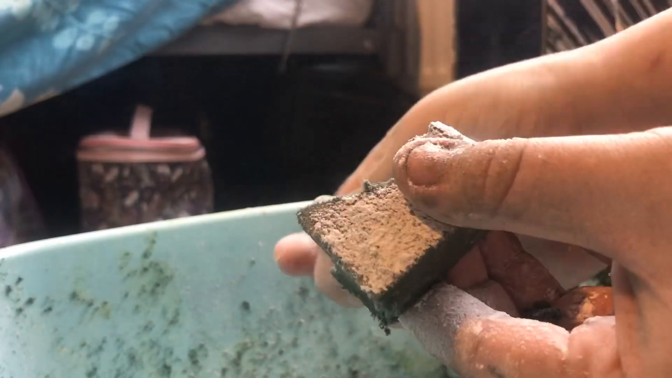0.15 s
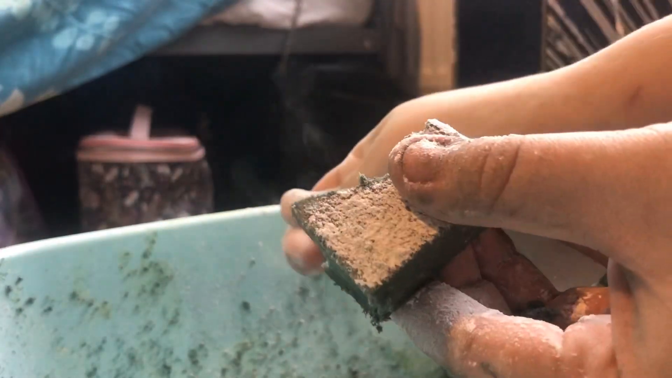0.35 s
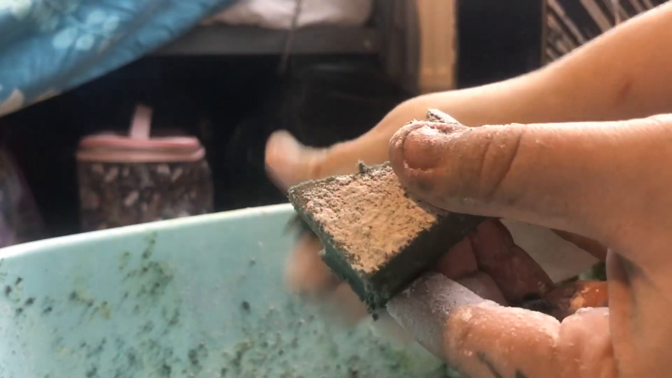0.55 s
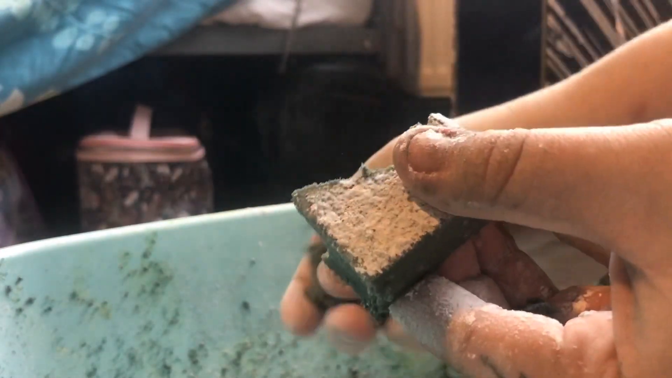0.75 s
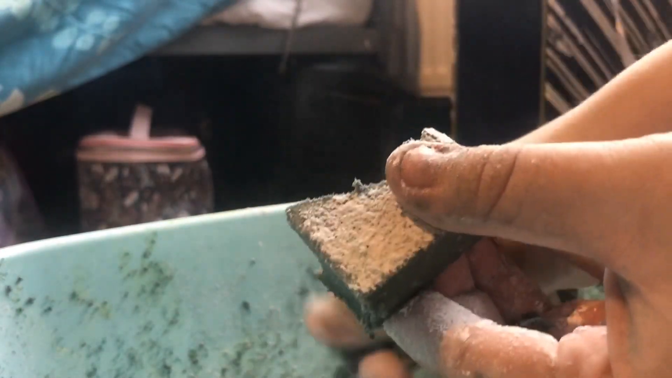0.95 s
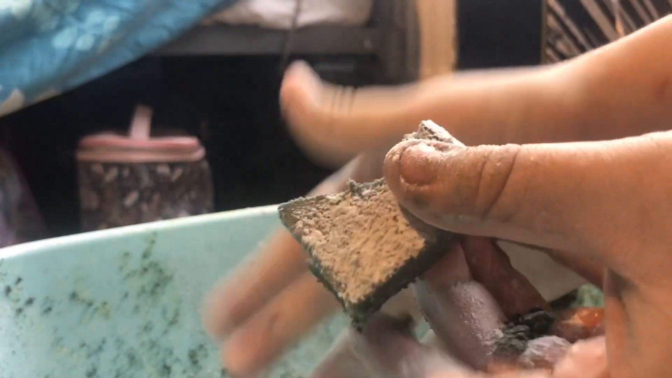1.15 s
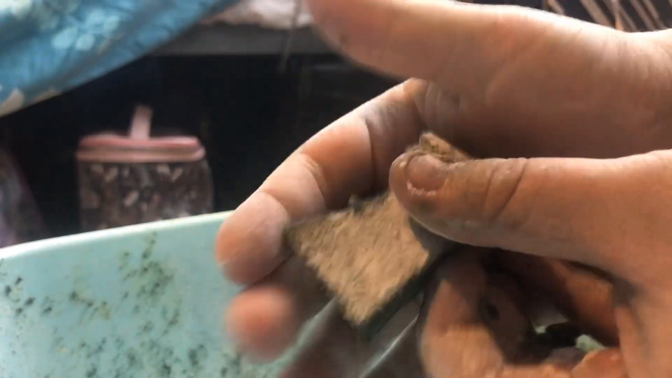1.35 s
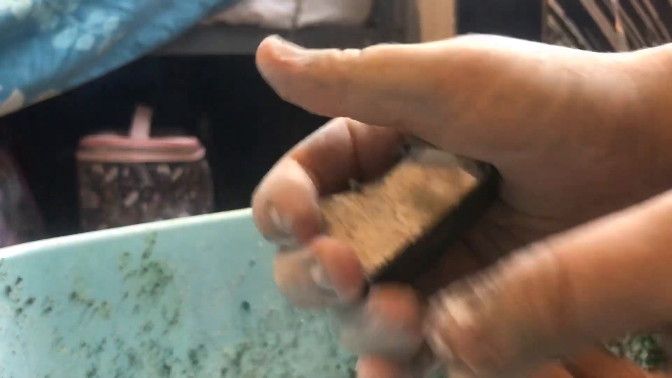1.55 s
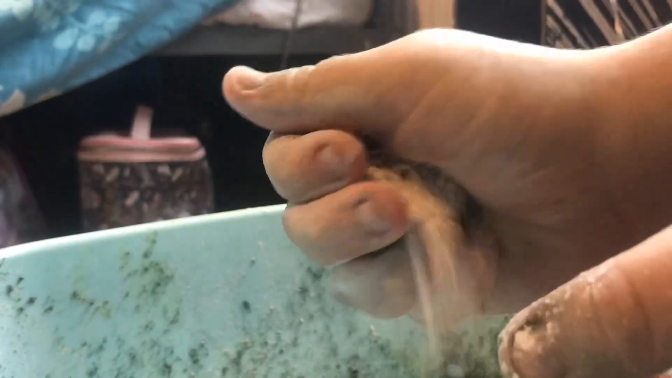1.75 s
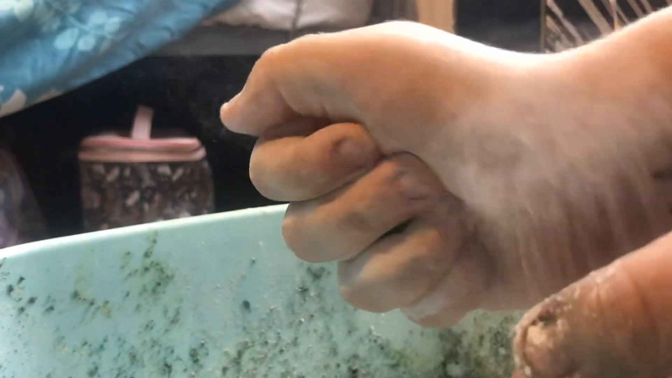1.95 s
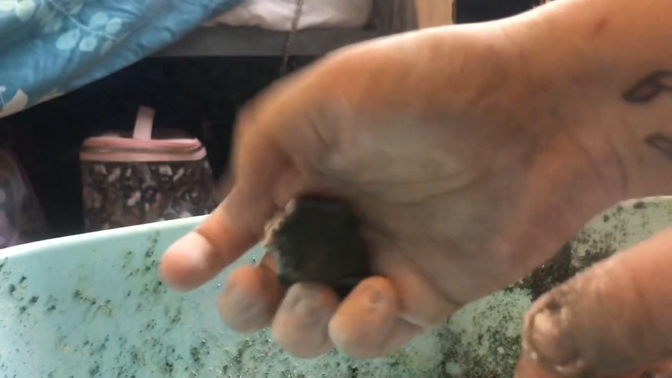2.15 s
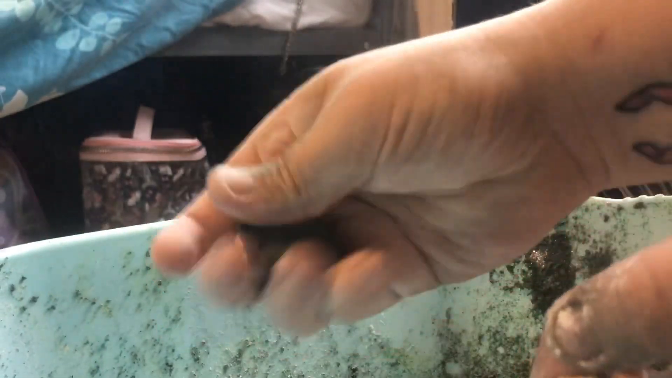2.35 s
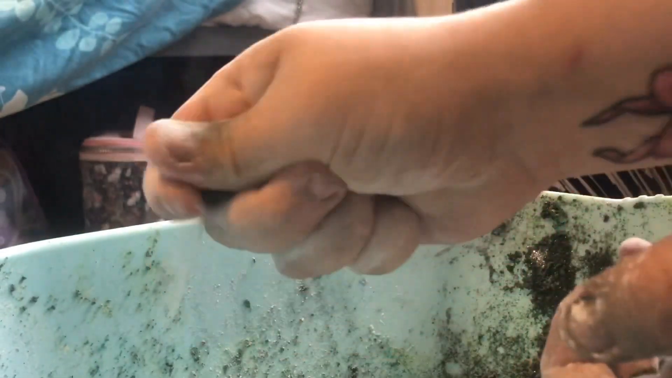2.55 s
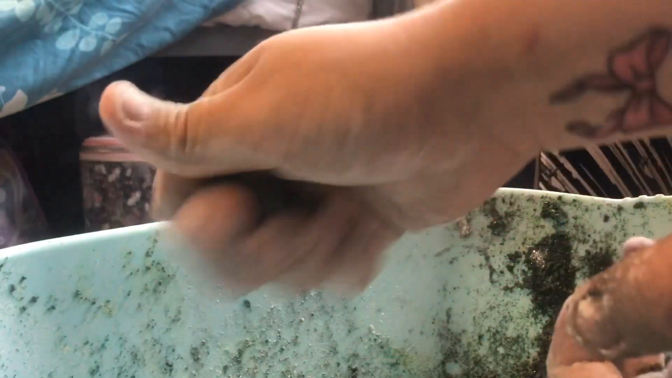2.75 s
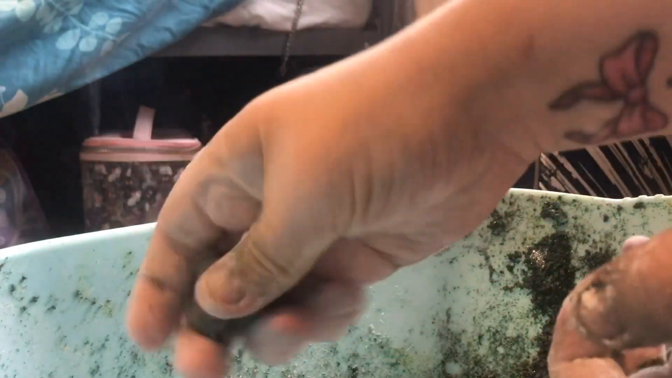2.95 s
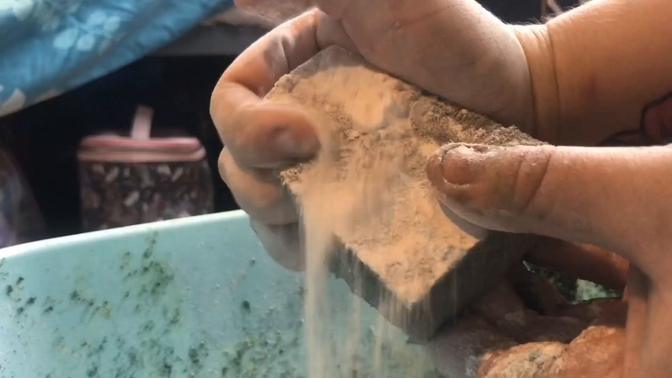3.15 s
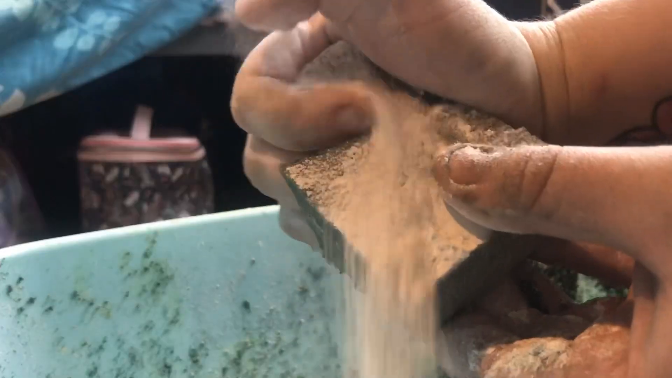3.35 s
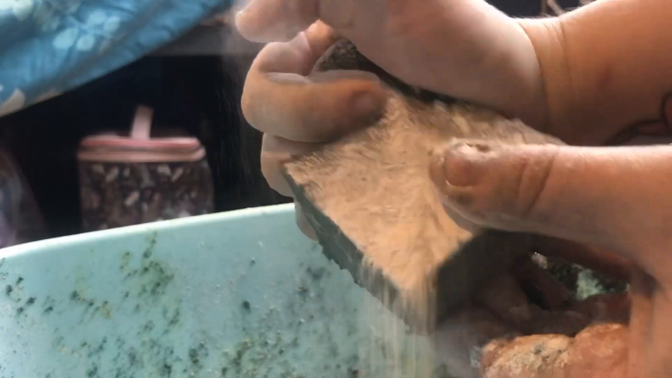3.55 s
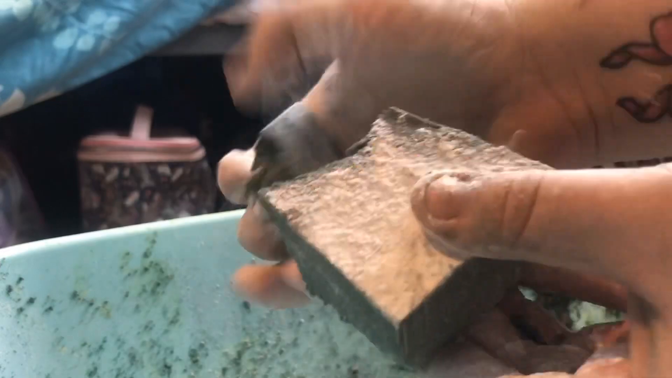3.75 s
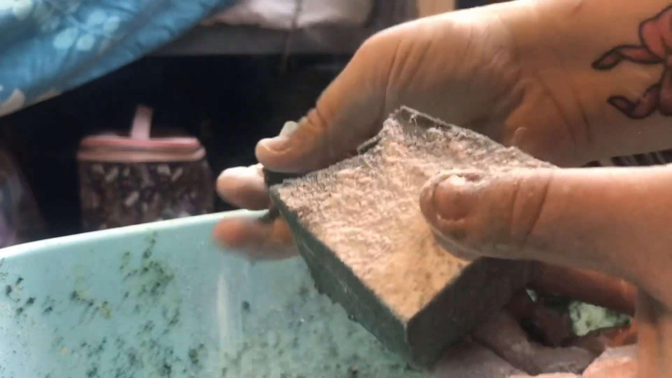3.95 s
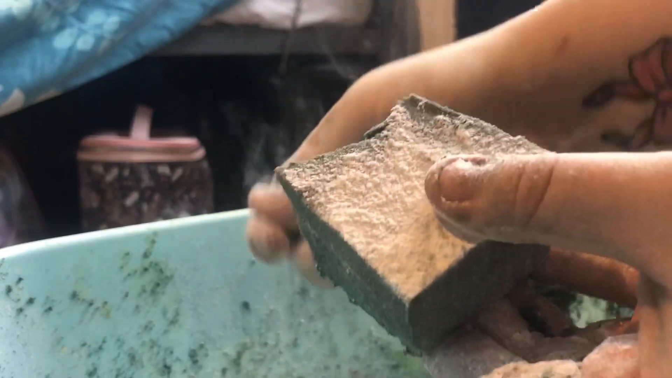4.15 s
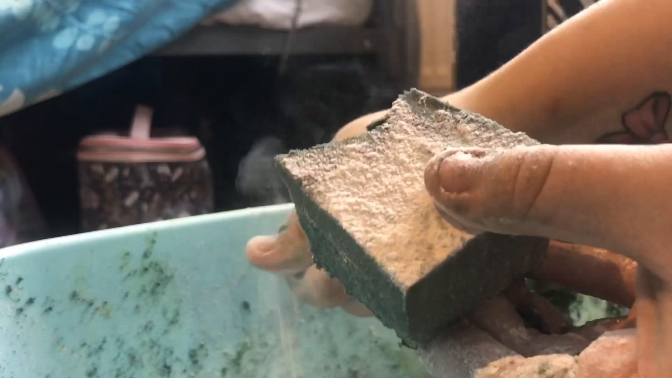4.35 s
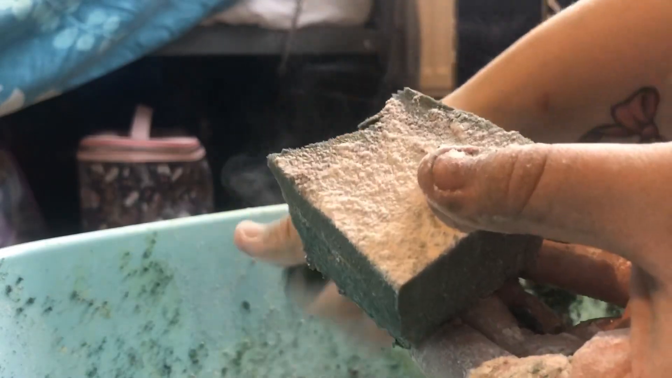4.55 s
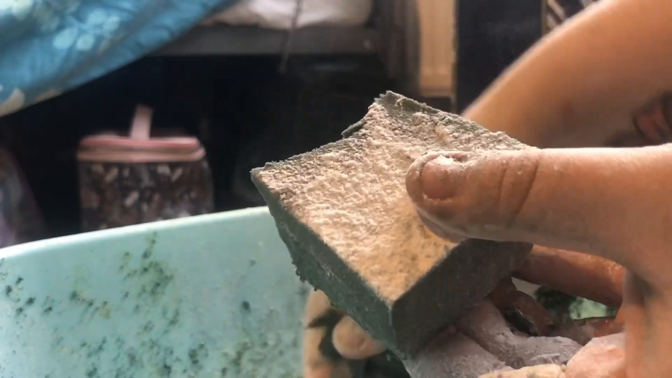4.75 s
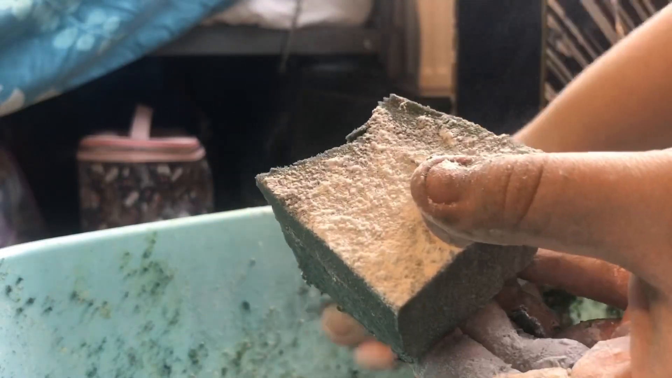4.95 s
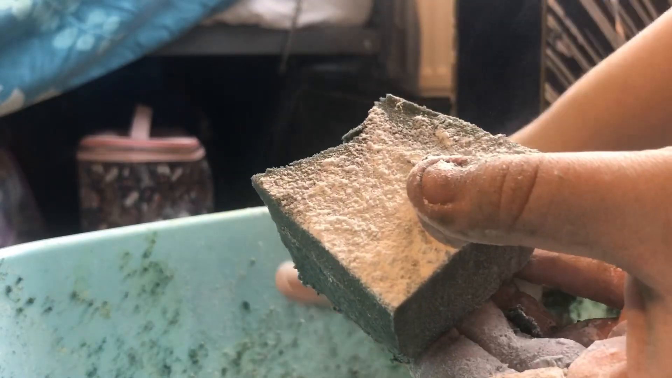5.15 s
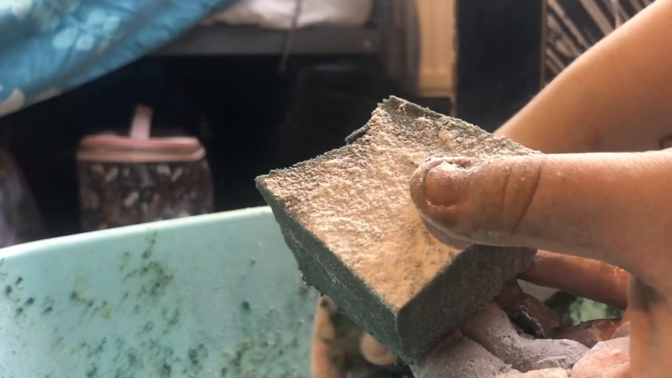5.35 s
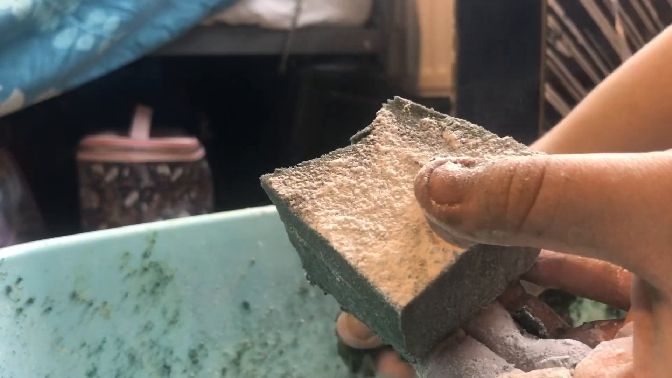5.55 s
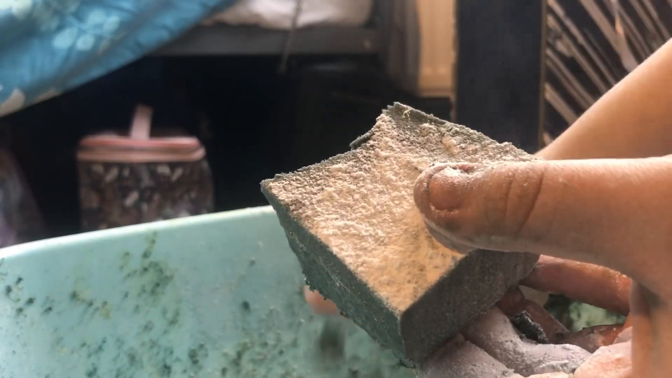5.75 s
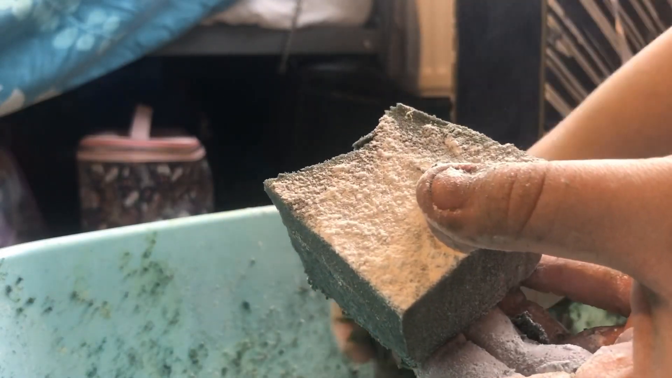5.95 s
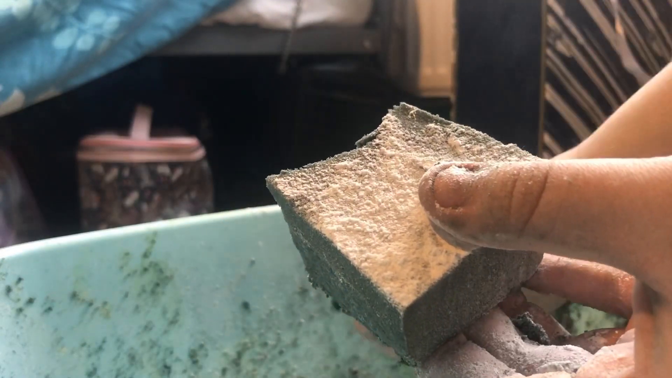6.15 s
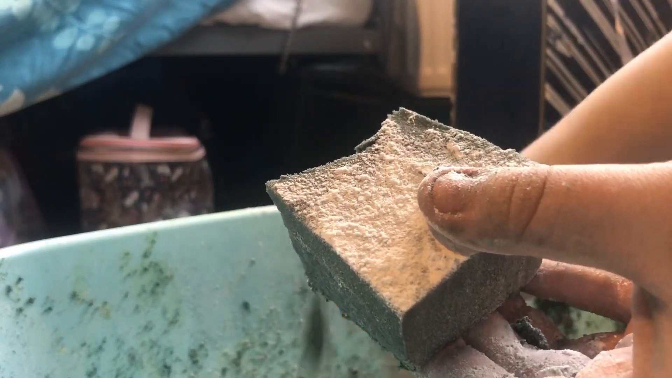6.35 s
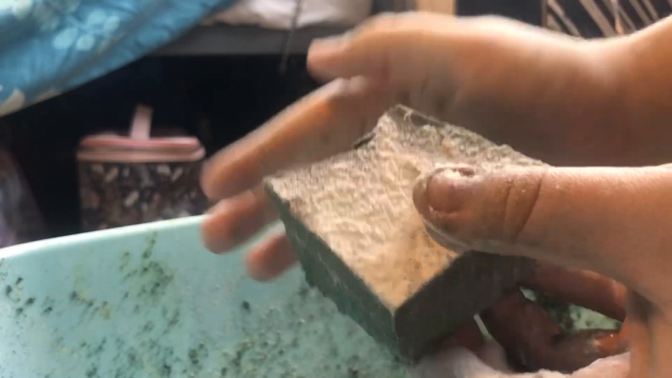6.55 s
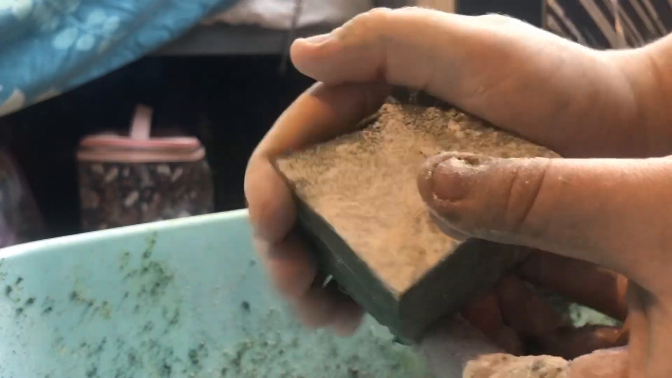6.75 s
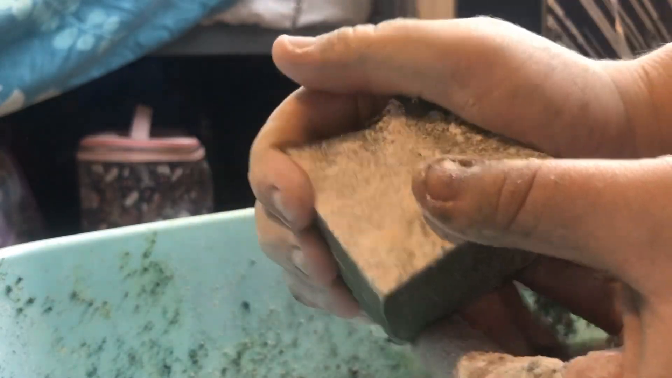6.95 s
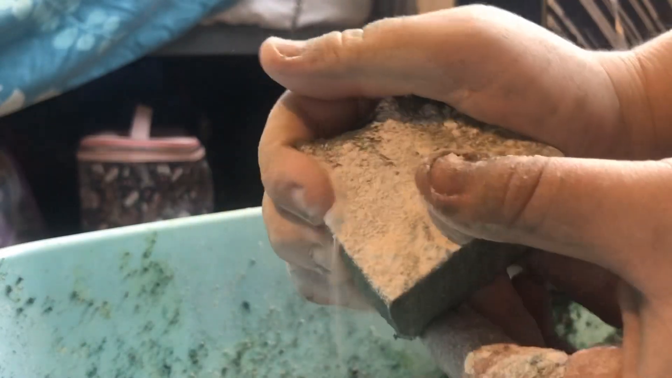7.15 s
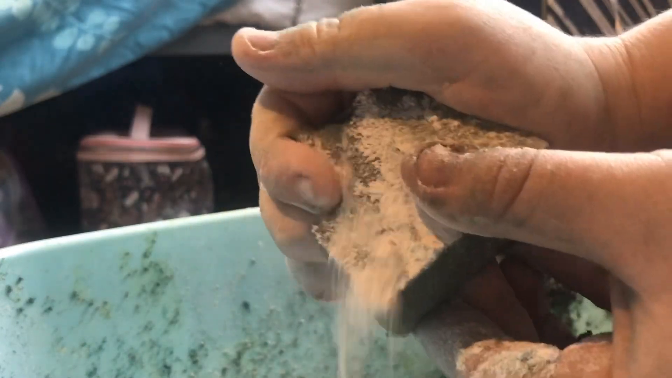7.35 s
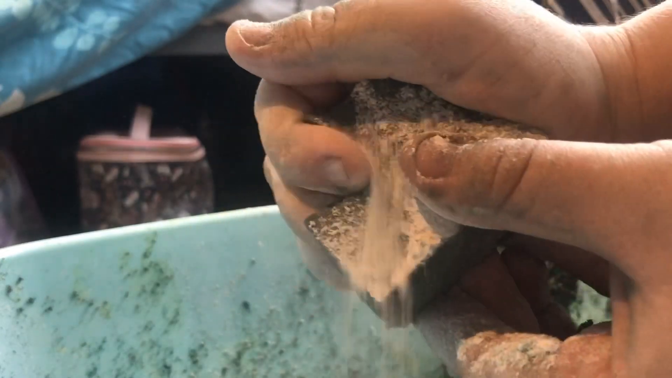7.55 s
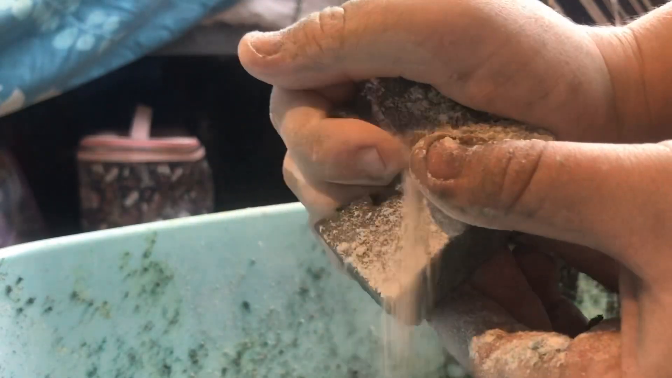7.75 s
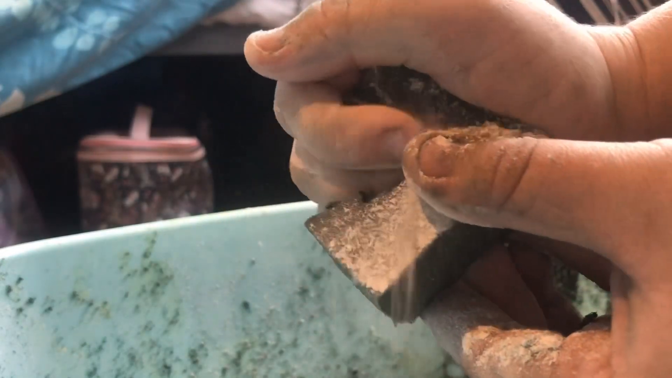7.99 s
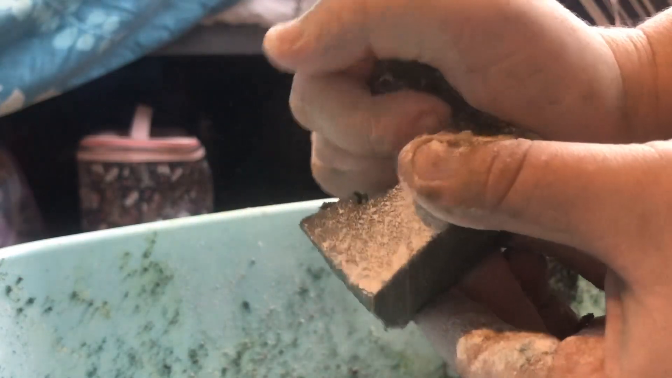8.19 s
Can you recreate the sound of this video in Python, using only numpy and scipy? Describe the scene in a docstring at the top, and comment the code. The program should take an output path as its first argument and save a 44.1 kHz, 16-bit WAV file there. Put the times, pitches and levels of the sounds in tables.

```python
"""Hands crumble a block of dry, powdered foam over a plastic tub, close by, while a quiet room hums.
First come light crackles: brittle cell walls break in bursts of tiny clicks, and thicker struts snap.
A hard squeeze follows at 1.6 s, coloured by the cupped hand and the block. Just after 3 s the sound cuts
out briefly, and more squeezes follow. Then the hands rub gently, with a few soft knocks on the tub,
until the longest crunch runs from about 7 s to the end."""
import sys
import numpy as np
from scipy import signal
from scipy.io import wavfile

SR = 44100
rng = np.random.default_rng(int(sys.argv[2]) if len(sys.argv) > 2 else 0)


def to_wav(sig):
    """Store sig (one row per channel, or 1-D mono) as 16-bit WAV at the path in sys.argv[1].

    Samples outside -1..1 are clipped; the rate is SR.
    """
    pcm = np.clip(np.atleast_2d(sig), -1, 1) * 32767
    pcm = np.round(pcm).astype(np.int16)
    wavfile.write(sys.argv[1], SR, pcm.T)  # frames by channels


N = 362502

# The tone of the room's hum: pitch_hz, level_db
ROOM_TONE = [(30, -20), (48, 3), (190, 3), (440, -4), (740, -2), (1200, -12.5), (2000, -23.5), (5000, -21),
             (15000, -34)]
# Crumbs and fingers knocking on the tub: start_s, peak_db, pitch_hz
TUB_KNOCKS = [(2.155, -43, 510), (2.385, -51, 90), (4.941, -46, 600), (5.82, -49, 329), (6.40, -54.5, 444),
              (6.425, -55, 337), (6.659, -48.5, 430)]
# The dull tones of the foam block: pitch_hz, width_hz, level_db
BLOCK_TONES = [(133, 260, -3.5), (188, 71, -1), (270, 77, -3), (377, 98, -3.5), (600, 390, -3.5),
               (790, 530, 1)]
# The hollow tones of the cupped hand: pitch_hz, width_hz, level_db
HAND_TONES = [(1053, 220, 0), (1357, 335, 3.5), (1730, 500, 4.5), (2200, 260, -4), (2800, 610, 1),
              (3300, 680, -1), (4030, 1230, 4.5)]
# The main struts that snap: start_s, level_db, pitch_hz, fade_s (time to fade by 60 dB)
STRUT_SNAPS = [(0.0156, -38, 3320.0, 0.0094), (0.0375, -23, 3080.0, 0.0067), (0.051, -22, 3360.0, 0.0052),
               (0.08, -25, 4180.0, 0.0077), (0.0877, -28, 3270.0, 0.0048), (0.0943, -25, 4500.0, 0.0058),
               (0.106, -25, 4240.0, 0.0062), (0.13, -27, 7040.0, 0.0067), (0.1946, -25.5, 3170, 0.037),
               (0.2507, -38, 1740, 0.011), (0.6846, -33, 4180.0, 0.0048), (0.7147, -32, 2410.0, 0.0209),
               (0.742, -26, 3650, 0.061), (1.278, -39, 4290.0, 0.057), (1.443, -21, 1570, 0.025),
               (1.4626, -35, 5380.0, 0.0077), (1.4759, -26.5, 2300.0, 0.017), (1.4914, -30, 3340.0, 0.0066),
               (1.5332, -33, 8270.0, 0.0367), (1.5535, -11.5, 2900, 0.014), (1.557, -14, 2270, 0.0059),
               (1.575, -17, 1530.0, 0.0081), (1.596, -11, 1650, 0.01), (1.6016, -2, 2980, 0.011),
               (1.6459, -16, 9000, 0.005), (1.6534, -11, 3270, 0.0049), (1.6588, -12, 1580, 0.013),
               (1.6687, -11.5, 1460.0, 0.0084), (1.694, -13, 3170.0, 0.0047), (1.7271, -16, 6680.0, 0.018),
               (1.7349, -17, 6570.0, 0.012), (1.7713, -16, 1170, 0.012), (1.7934, -25.5, 1260, 0.0145),
               (1.846, -28.5, 11610.0, 0.0099), (2.0041, -31.5, 2410.0, 0.044), (2.028, -29, 1580, 0.0094),
               (2.2817, -30.5, 2890.0, 0.0053), (2.3102, -25.5, 2240.0, 0.032),
               (2.3634, -20, 7580.0, 0.0195), (2.38, -23, 10340.0, 0.043), (2.4655, -29, 9430.0, 0.011),
               (2.503, -37, 9540.0, 0.0161), (2.8802, -31, 3040.0, 0.0345), (2.941, -20, 2660, 0.022),
               (3.0097, -26, 2780.0, 0.0472), (3.1114, -17, 5100, 0.0162), (3.124, -15.5, 5380.0, 0.025),
               (3.1522, -11.5, 5530.0, 0.019), (3.1621, -17, 6460.0, 0.0062), (3.2199, -15.5, 4940, 0.015),
               (3.2935, -14, 7600, 0.025), (3.2965, -7.5, 5600, 0.007), (3.459, -24.5, 4800, 0.012),
               (3.5515, -12.5, 4470, 0.009), (3.571, -5, 6660, 0.011), (3.5788, -19, 9500, 0.05),
               (3.5884, -22, 6400.0, 0.019), (3.6483, -36, 3210.0, 0.0284), (3.699, -31, 1420.0, 0.03),
               (3.8077, -35, 1980.0, 0.037), (3.951, -30, 2240.0, 0.0076), (4.0046, -18, 1660, 0.0341),
               (4.0425, -31, 2800.0, 0.057), (4.1373, -21.5, 3100, 0.041), (4.1727, -32, 5380.0, 0.009),
               (4.214, -29, 5530.0, 0.0059), (4.2485, -34, 7700, 0.021), (5.4358, -38.5, 2010, 0.061),
               (5.7832, -41.5, 2350.0, 0.017), (6.216, -36.5, 9470.0, 0.0212), (6.487, -47, 4820, 0.0237),
               (6.6613, -27.5, 3160, 0.05), (6.7234, -32.5, 4370.0, 0.01), (6.8541, -40, 1870.0, 0.0097),
               (6.8869, -21.5, 5400.0, 0.0088), (6.9125, -13.5, 6240, 0.0049),
               (6.9477, -20, 3170.0, 0.0072), (6.9553, -25, 1570.0, 0.011), (6.977, -16.5, 3170.0, 0.0068),
               (6.998, -28, 6930.0, 0.032), (7.031, -25, 7750.0, 0.0082), (7.0603, -23, 4970.0, 0.0059),
               (7.0808, -20, 6550.0, 0.015), (7.0956, -7.5, 6870.0, 0.0077), (7.1394, -18, 2060, 0.0185),
               (7.1573, -13, 1860, 0.017), (7.1621, -9, 3770, 0.0088), (7.2598, -17, 3600.0, 0.015),
               (7.2672, -14, 7560.0, 0.0064), (7.299, -21, 3700, 0.011), (7.3174, -17, 6960.0, 0.0085),
               (7.3334, -14, 5680.0, 0.018), (7.3606, -15, 6630.0, 0.0221), (7.3818, -19, 5560.0, 0.0108),
               (7.4355, -16, 5040.0, 0.0064), (7.446, -18, 8350.0, 0.0204), (7.4608, -17.5, 5370, 0.04),
               (7.468, -15, 5640.0, 0.0054), (7.4797, -11.5, 8600, 0.022), (7.5046, -20, 6630.0, 0.0051),
               (7.5271, -21, 5770.0, 0.022), (7.5874, -11.5, 6440.0, 0.035), (7.5976, -18, 3200, 0.016),
               (7.639, -16, 7280.0, 0.0189), (7.657, -9.5, 3420.0, 0.014), (7.6744, -11, 5940, 0.0115),
               (7.7182, -22, 8660.0, 0.02), (7.753, -24, 5430.0, 0.0292), (7.784, -22.5, 6240.0, 0.045),
               (7.8134, -14, 12470.0, 0.0245), (7.857, -20, 5600.0, 0.06), (7.9392, -21, 3470, 0.0081),
               (7.9814, -23, 10470.0, 0.04), (8.0585, -18.5, 6630.0, 0.03), (8.066, -26, 8810.0, 0.0098),
               (8.085, -18, 5800, 0.0068), (8.1372, -14, 3630, 0.0265), (8.176, -29, 4360, 0.025),
               (8.2006, -13, 4100, 0.0033)]
# How strongly breaking cell walls ring: pitch_hz, level_db
CELL_TONE = [(4300, -11), (5500, 2.5), (7000, 1), (9000, 1), (12000, 1.5), (15500, 5)]
# Each squeeze or rub: full_strength_at_s, rise_s, hold_s, fall_s, crunch_db, powder_db, hand_pitch_hz,
# hand_db, block_pitch_hz, block_db (powder, hand and block levels are relative to the crunch)
SQUEEZES = [(0.056, 0.13, 0.026, 0.18, -40.5, -7, 3520, -0.2, 700.0, -30.5),
            (0.188, 0.055, 0.017, 0.097, -44, -1.2, 3310.0, -4.5, 750.0, -19),
            (0.384, 0.17, 0.03, 0.076, -49.5, 0, 2270, -7, 320.0, -16.5),
            (0.47, 0.016, 0.038, 0.07, -58.5, -4, 2840, 3, 350.0, -10.1),
            (0.546, 0.05, 0.03, 0.05, -71, -6, 3400, -1, 300, -5),
            (0.689, 0.1, 0.061, 0.13, -45.0, -3.5, 3680, -0.5, 340.0, -22.5),
            (0.916, 0.112, 0.011, 0.15, -48, -3, 3070, -7.5, 570.0, -17),
            (1.009, 0.01, 0.033, 0.017, -54.5, 0, 2800, -2, 360.0, -10),
            (1.153, 0.14, 0.00083, 0.125, -68, 2, 2140, -3.5, 410.0, -20),
            (1.273, 0.004, 0.117, 0.2, -51.5, -1.5, 2920, -3.5, 640.0, -18),
            (1.371, 0.099, 0, 0.035, -45, -5, 2830, -0.5, 650.0, -28),
            (1.443, 0.02, 0.035, 0.037, -48, -3, 2320, -1.5, 720.0, -18.7),
            (1.551, 0.029, 0.02, 0.11, -34.5, -2, 2280, -6, 640.0, -24.5),
            (1.598, 0.015, 0.0082, 0.12, -22, -3.5, 2650, -7.5, 740.0, -31),
            (1.736, 0.11, 0, 0.084, -28.5, 2, 2730, -5.5, 657, -14),
            (1.78, 0.01, 0.049, 0.046, -44.5, 4, 1880, -6, 663, -2),
            (2.006, 0.13, 0.011, 0.11, -46.5, 0, 2700, -0.5, 537, -14),
            (2.14, 0.16, 0.041, 0.047, -50.5, -6, 2890, 0.5, 497, -11.5),
            (2.297, 0.071, 0.016, 0.24, -38.5, -0.5, 2980, 0.5, 730.0, -26.5),
            (2.352, 0.033, 0.03, 0.06, -31, -5, 3180, -8.5, 736, -26.5),
            (2.477, 0.076, 0.046, 0.069, -52.5, 4, 3200, -22, 400, -14),
            (2.58, 0.028, 0.026, 0.081, -44.8, 0.8, 1990.0, -8, 750.0, -18),
            (2.685, 0.012, 0.046, 0.15, -54, -5, 2730, -2.0, 650.0, -31.4),
            (2.881, 0.035, 0.0021, 0.05, -49, -12, 3070, 3.5, 500, -17),
            (2.949, 0.059, 0, 0.12, -34.5, 0.5, 3260, -4.5, 389, -36),
            (3.012, 0.06, 0, 0.109, -43, 4, 2980.0, -3, 600.0, -43),
            (3.16, 0.2, 0.021, 0.15, -27.5, -2, 2650, -8, 650.0, -16.5),
            (3.281, 0.18, 0.1, 0.1, -29.5, 0.8, 3240, -6.5, 407, -15.5),
            (3.577, 0.031, 0.0063, 0.057, -31, -2, 3070, -5, 403, -18),
            (3.697, 0.23, 0.0041, 0.081, -52.5, -3.5, 2650, 1, 470.0, -11),
            (3.803, 0.074, 0.0, 0.16, -53.5, -3.5, 2150, 2.5, 540.0, -12),
            (4.004, 0.14, 0.0, 0.185, -41, -3.5, 2860, 0.0, 670.0, -21),
            (4.135, 0.07, 0.0012, 0.09, -35, -2, 2670, -5, 776, -20.5),
            (4.218, 0.026, 0.0012, 0.2, -41.5, 1.3, 3650, -12.5, 600.0, -23),
            (4.346, 0.06, 0.022, 0.088, -53.5, -7, 2830, 7, 300, -7),
            (4.55, 0.11, 0.014, 0.144, -54.5, 0, 2870, -0.2, 270.0, -11.0),
            (4.809, 0.26, 0.21, 0.14, -53, -3, 2750, -2.5, 407, -13),
            (4.905, 0.007, 0.052, 0.012, -51.5, -1, 2900, -12, 560.0, -22),
            (5.191, 0.065, 0.05, 0.08, -62, -4, 2600, -1.5, 390.0, -10),
            (5.418, 0.18, 0.12, 0.13, -51.5, -4, 2970, -3.5, 544, -14.5),
            (5.59, 0.024, 0.017, 0.131, -48.5, -1.5, 3030, -10, 640.0, -15),
            (5.765, 0.231, 0.066, 0.35, -61.5, -5, 2500, 0, 360.0, -5),
            (5.979, 0.11, 0.026, 0.168, -48.5, -8, 3180, -3.5, 530.0, -21),
            (6.076, 0.013, 0.032, 0.12, -47, -5, 3020, -7.5, 380.0, -26.0),
            (6.217, 0.035, 0.019, 0.084, -48, -4.5, 3380, -3.5, 582, -18),
            (6.401, 0.01, 0.061, 0.02, -70, -2.5, 2930, -7, 388, -3),
            (6.479, 0.021, 0.01, 0.081, -61.5, -6, 3140.0, -3.5, 330.0, -28),
            (6.659, 0.004, 0.075, 0.079, -51.5, -11, 2870, -2.8, 474, -20.5),
            (6.884, 0.017, 0, 0.011, -45.5, -4, 2180.0, -6, 450.0, -28),
            (6.944, 0.12, 0.065, 0.0077, -37, -2.5, 2370, -4.5, 650.0, -20.5),
            (7.068, 0.014, 0, 0.213, -35.5, 1, 2200.0, -9, 660.0, -21.9),
            (7.169, 0.249, 0.045, 0.014, -30.5, -1.5, 2240, -7, 600.0, -19),
            (7.295, 0.12, 0.082, 0.084, -31.5, 0.2, 3170, -6.5, 570, -22.5),
            (7.445, 0.01, 0.051, 0.066, -27, -1.5, 2850, -6, 427, -21.5),
            (7.582, 0.004, 0.089, 0.03, -29, -1.5, 3050, -9, 490.0, -21.5),
            (7.708, 0.076, 0.0085, 0.15, -33.5, -0.5, 3160, -8, 470.0, -24),
            (7.82, 0.085, 0.00031, 0.033, -34.5, -3, 3300.0, -11.5, 480.0, -24),
            (7.853, 0.0048, 0.0774, 0.02, -28, -1.5, 3230.0, -6.5, 625, -21.5),
            (7.98, 0.0053, 0.013, 0.12, -28.5, 0.1, 3480, -7.5, 740.0, -16.5),
            (8.135, 0.24, 0.001, 0.184, -35.5, 1, 2970, -4.5, 517, -18)]

ROOM_DB, TRICKLE_DB = -67.5, -83   # the trickle is loose powder that never quite rests
DROPOUT_START_S, DROPOUT_END_S = 3.026, 3.0955


def from_db(db):
    return 10 ** (np.asarray(db) / 20)


def unit_level(x):
    return x / np.sqrt(np.mean(x ** 2) + 1e-20)


def level_at(table, hz):
    pitch_hz, level_db = np.transpose(table)
    return np.interp(np.log(hz), np.log(pitch_hz), level_db)


def ring(x, hz, width_hz):
    """Lets a sound ring at one pitch; a narrower width rings longer."""
    r = np.exp(-np.pi * width_hz / SR)
    feedback = [1, -2 * r * np.cos(2 * np.pi * hz / SR), r * r]
    return signal.lfilter(np.array([1, 0, -1]) * (1 - r * r) / 2, feedback, x + 1e-18)


def drift(rate_hz):
    """A slow random wander, about 1 in size."""
    r = np.exp(-80 * np.pi * rate_hz / SR)
    slow = signal.lfilter([1], [1, -2 * r, r * r], rng.standard_normal(N // 40 + 2002))[2000:]
    return np.interp(np.arange(N) / 40, np.arange(len(slow)), unit_level(slow))


def clicks(per_s, spread_db, limit=5.4):
    """Clicks of random size at random moments."""
    sizes = from_db(spread_db * np.minimum(rng.exponential(1, N), limit)) * rng.choice([-1, 1], N)
    return sizes * (rng.random(N) < per_s / SR)


def room_hum():
    """The room hums: steady noise, strongest in the low bands."""
    edges_hz, noise = 30 * 2 ** np.arange(0, 9.6, .5), rng.standard_normal((2, N))
    out = 0
    for k, (low, high) in enumerate(zip(edges_hz, edges_hz[1:])):
        band = signal.sosfilt(signal.butter(2, [low, high], "band", fs=SR, output="sos"), noise[k % 2])
        out += from_db(level_at(ROOM_TONE, np.sqrt(low * high))) * band
    return unit_level(out)


def tub_knocks():
    """Crumbs and fingers hit the tub, each with a short, dull puff."""
    out, t = np.zeros(N), np.arange(SR // 8) / SR
    for start_s, peak_db, hz in TUB_KNOCKS:
        puff = rng.standard_normal(len(t)) * t * np.exp(-t / 0.0025)
        knock = ring(ring(puff, hz, 0.75 * hz), hz, 1.4 * hz)
        out[round(start_s * SR):][:len(t)] += from_db(peak_db) * knock / np.abs(knock).max()
    return out


def block_thumps(block_db, boost_db=2):
    """Each main snap jolts the block into a dull thump."""
    start_s, snap_db = np.transpose(STRUT_SNAPS)[:2]
    at = (start_s * SR).astype(int)
    out, chance = 0, rng.standard_normal((len(at), len(BLOCK_TONES)))
    for k, (hz, width_hz, level_db) in enumerate(BLOCK_TONES):
        strength = from_db(snap_db + boost_db + block_db[at] + level_db) * chance[:, k]
        push = np.zeros(N)
        push[at] = strength * SR / (2 * np.pi * width_hz)
        out += ring(ring(push, hz, width_hz), hz, 2 * width_hz)
    return out / len(BLOCK_TONES)


def shaken_body(tones, activity, per_s, centre_hz, db_per_octave, low_db_per_octave):
    """Breaks make the hand or block ring; tones fade away from the centre pitch, faster far below it."""
    out, power = 0, 0
    for hz, width_hz, level_db in tones:
        octaves_below = np.log2(centre_hz / hz)
        gain = from_db(level_db - db_per_octave * np.abs(octaves_below)
                       - low_db_per_octave * np.maximum(octaves_below - .6, 0))
        shaken = ring(activity * clicks(per_s, spread_db=3), hz, width_hz)
        out += gain * from_db(2.2 * drift(7.2)) * unit_level(ring(shaken, hz, 2 * width_hz))
        power += gain ** 2
    return out / np.sqrt(power)


def palm_echo(x, delay_s=.0014, spread=.5, strength=.33, grips_per_s=20):
    """An echo off the palm makes the crunch hollow; its delay jumps with each new grip."""
    grip = np.cumsum(rng.random(N) < grips_per_s / SR)
    lag = (SR * delay_s * np.exp(spread * rng.standard_normal(N))[grip]).astype(int)
    echo = x[np.maximum(np.arange(N) - lag, 0)]
    return (x + strength * echo) / np.sqrt(1 + strength ** 2)


def small_struts(crunch_db, per_s=10, firm_db=-42):
    """Lists the snaps of small struts: they give way at random, louder in a firm squeeze."""
    count = int(per_s * N / SR)
    at = rng.integers(0, N, count)
    loudness, pitch, length = rng.standard_normal((count, 3)).T
    softening_db = 0.4 * np.minimum(crunch_db[at] - firm_db, 0)
    level_db = crunch_db[at] + 12.5 + softening_db + 3.5 * loudness
    pitch_hz = np.clip(4300 * 2 ** (0.76 * pitch), 1200, 12000)
    return list(zip(at / SR, level_db, pitch_hz, .007 * 2 ** length))


def strut_snaps(rows):
    """A strut snaps with a tick and a ring, then a fading spray of smaller breaks; no bass."""
    out, t = np.zeros(N + SR), np.arange(SR // 8) / SR
    for start_s, level_db, hz, fade_s in rows:
        spray = rng.standard_normal(len(t)) * from_db(-60 * t / max(fade_s, .002))
        spray[0] = 4 * np.sign(spray[0])   # the tick
        crack = ring(spray, hz, 0.22 * hz) + 0.46 * ring(spray, 2300, 2000)
        crack += 0.17 * ring(spray, 4300, 9000)
        out[round(start_s * SR):][:len(t)] += from_db(level_db) * crack / np.abs(crack).max()
    return signal.sosfilt(signal.butter(3, 1000, "high", fs=SR, output="sos"), out[:N])


def squeezes(edge_db=20):
    """Each squeeze swells, holds and dies away. They add up, and the strongest leads the tone."""
    full_s, rise_s, hold_s, fall_s, crunch_db, *tone_columns = np.transpose(SQUEEZES)[:, :, None]
    t = np.arange(0, N, 40) / SR
    before = np.maximum(full_s - t, 0) / (rise_s + 1 / SR)
    after = np.maximum(t - full_s - hold_s, 0) / (fall_s + 1 / SR)
    power = from_db(2 * np.maximum(crunch_db - edge_db * (before + after), -150))
    total_db = 10 * np.log10(power.sum(0) + from_db(2 * TRICKLE_DB))
    tone = [np.sum(power * column, 0) / power.sum(0) for column in tone_columns]
    return [np.interp(np.arange(N) / SR, t, curve) for curve in [total_db] + tone]


def avalanches(per_s, steady_share, fade_s=.007):
    """One break sets off its neighbours: sudden swells of activity on top of a steady share."""
    triggers = clicks(per_s, spread_db=4, limit=2.2) ** 2
    swell = signal.lfilter([1], [1, -from_db(-60 / (fade_s * SR))], triggers)
    return np.sqrt(steady_share + (1 - steady_share) * swell / np.mean(swell))


def breaking_cells(activity, powder_db):
    """Each cell wall rings briefly at a pitch set by its size; moving fingers shade some pitches."""
    breaks = activity * clicks(14000, spread_db=-2)
    size_group = rng.integers(0, 12, N)
    out = 0
    for k, hz in enumerate(np.geomspace(4300, 15500, 12)):
        powder_share = 1 / (1 + (9000 / hz) ** 8)
        gain = from_db(level_at(CELL_TONE, hz) + powder_share * powder_db + 0.76 * drift(4.7))
        ringing = ring(breaks * (size_group == k), hz, 0.32 * hz)
        out += gain * unit_level(ring(ringing, hz, 0.99 * hz))
    return out / 3.6


def scene():
    """Mixes the crunch, snaps, thumps, knocks and room into one channel."""
    crunch_db, powder_db, hand_hz, hand_db, block_hz, block_db = squeezes()
    steady_share = np.clip(.55 - (crunch_db + 32.5) / 50, .35, .95)   # rubs swish, hard squeezes crackle
    outside, inside = avalanches(350, steady_share), avalanches(250, steady_share)
    all_breaks = np.sqrt(.5 * outside ** 2 + .5 * inside ** 2)   # includes those hidden in the fist
    cells = palm_echo(breaking_cells(outside, powder_db))
    hand = shaken_body(HAND_TONES, all_breaks, 2500, hand_hz, db_per_octave=9, low_db_per_octave=6)
    block = shaken_body(BLOCK_TONES, all_breaks, 1500, block_hz, db_per_octave=6, low_db_per_octave=2)
    crunch = from_db(crunch_db) * (cells + from_db(hand_db) * hand + from_db(block_db) * block)
    snaps = strut_snaps(list(STRUT_SNAPS) + small_struts(crunch_db))
    return (crunch + snaps + block_thumps(block_db) + tub_knocks() + from_db(ROOM_DB) * room_hum())[None]


def record(dry):
    """Rounds off peaks, drops out once with a faint blip of hiss, and cuts the highest treble."""
    t = np.arange(N) / SR
    rounded = 0.74 * np.tanh(dry / 0.76)
    sound_on = (t < DROPOUT_START_S) | (t > DROPOUT_END_S)
    blip_s, fade_s, cutoff_hz = 3.034, 0.024, 15790
    hiss = np.diff(rng.standard_normal(N + 1))
    blip = hiss * (t > blip_s) * from_db(-51 - 60 * np.clip(t - blip_s, 0, 1) / fade_s)
    treble_cut = signal.ellip(14, .5, 80, cutoff_hz, fs=SR, output="sos")
    return signal.sosfilt(treble_cut, rounded * sound_on + blip)


dry = scene()
out = record(dry)
to_wav(out)
```